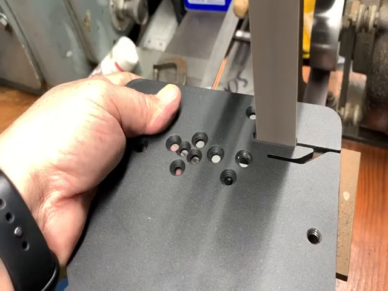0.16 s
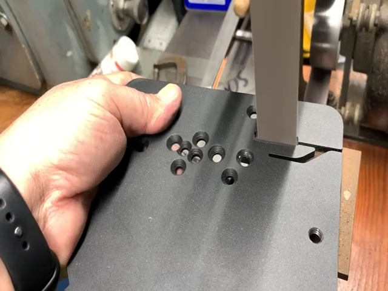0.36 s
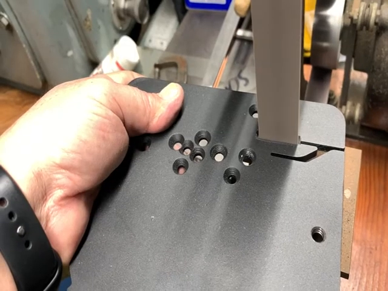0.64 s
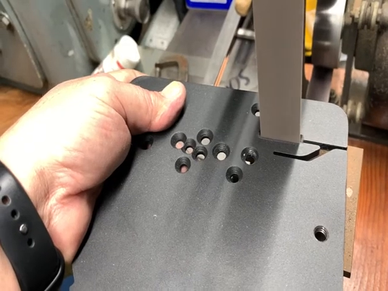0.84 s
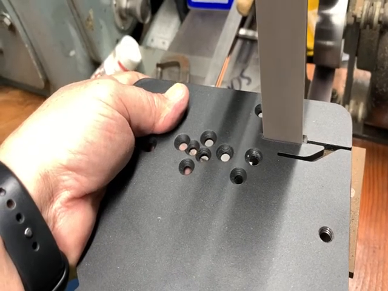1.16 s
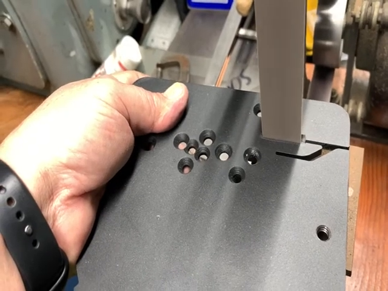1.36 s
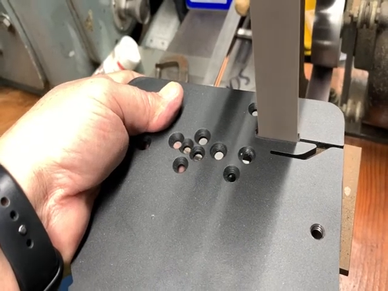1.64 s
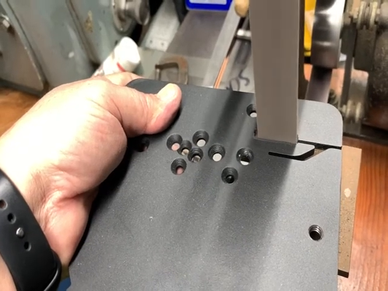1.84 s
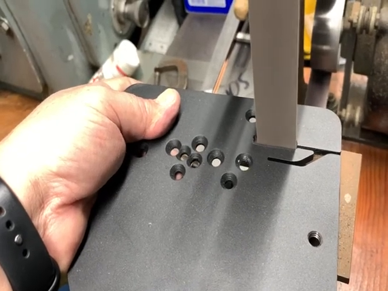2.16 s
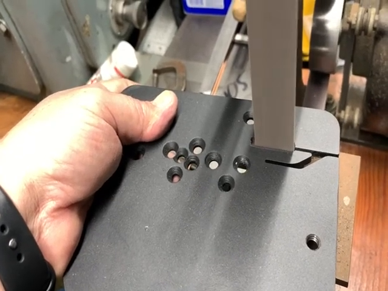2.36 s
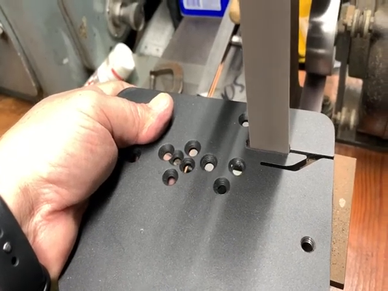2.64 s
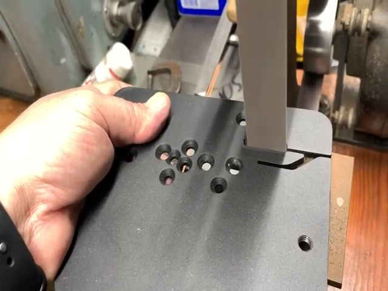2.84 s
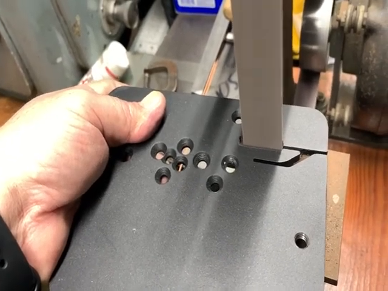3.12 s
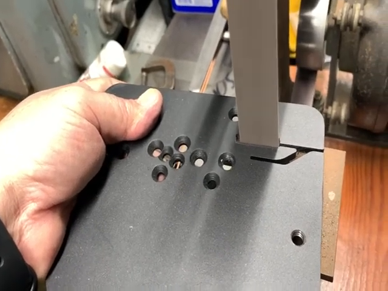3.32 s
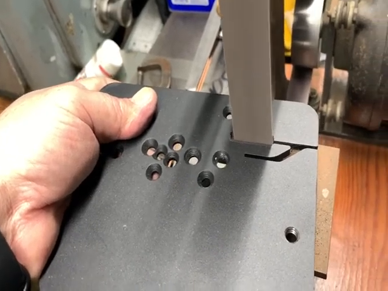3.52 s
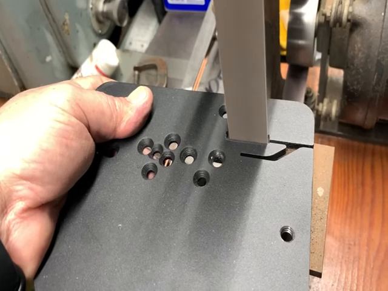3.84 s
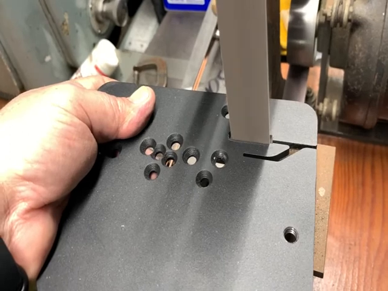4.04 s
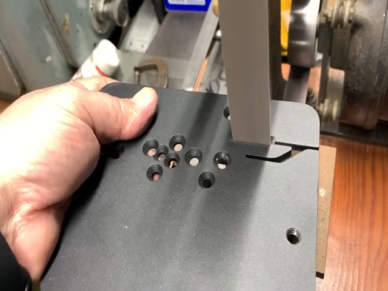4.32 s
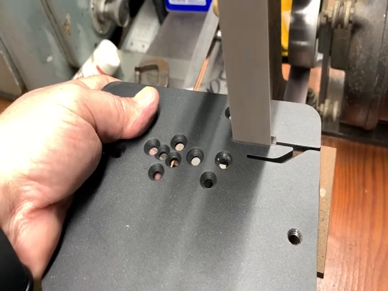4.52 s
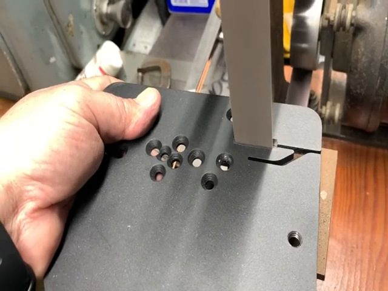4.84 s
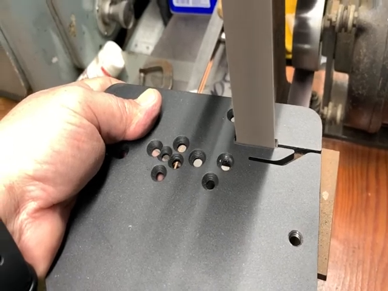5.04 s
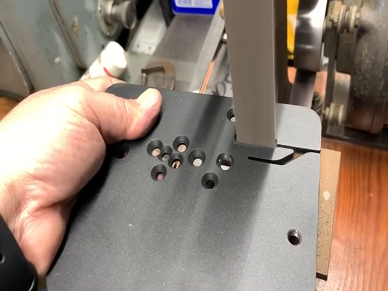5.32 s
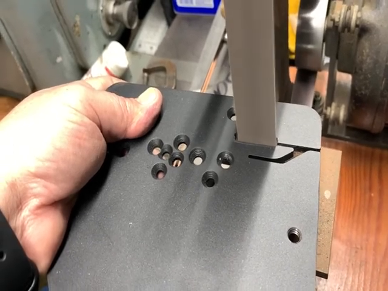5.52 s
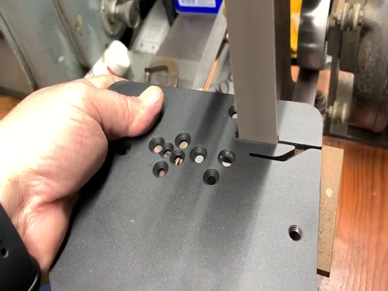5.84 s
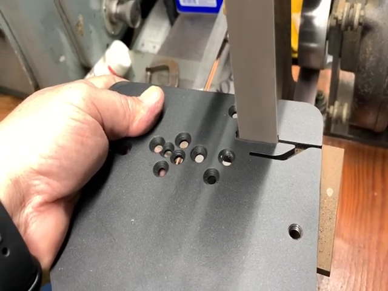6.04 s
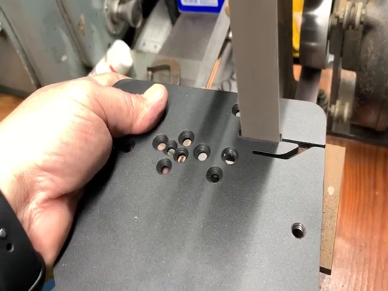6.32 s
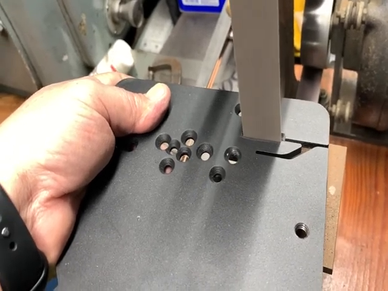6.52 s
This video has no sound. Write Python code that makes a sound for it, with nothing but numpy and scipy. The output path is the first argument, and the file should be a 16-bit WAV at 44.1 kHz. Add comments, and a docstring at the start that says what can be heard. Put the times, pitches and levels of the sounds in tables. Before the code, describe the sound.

In a workshop, a running abrasive belt grinds against a hand-held metal plate, close to the microphones. A bright, gritty hiss flutters in an uneven pattern repeating six or seven times a second. The plate rings thinly and its edge sings in spells, with sharp little ticks. Underneath, a motor hums, whirrs and rattles steadily. It runs from beginning to end without a stop.

```python
"""Endless abrasive band scraping along a metal plate

A motor drives a narrow endless abrasive band while a hand holds a metal plate against it, near the microphones.
Noise gated by the band's rough patches makes a gritty hiss whose pattern returns every lap; narrow resonances
of that rubbing make the plate ring thinly and its edge sing, and short decaying sines tick as the band snags.
Beneath, hum lines, shaped noise and bearing tones make the motor hum, whirr and knock once a turn,
and a low sine burst thumps once a lap as the band's joint passes."""
import sys
import numpy as np
from scipy import signal
from scipy.fft import rfft, irfft, next_fast_len
from scipy.io import wavfile

SR = 44100
rng = np.random.default_rng(int(sys.argv[2]) if len(sys.argv) > 2 else 0)


def file_out(sig):
    """Save sig as 16-bit WAV at sys.argv[1]."""
    # one column per channel
    cols = np.atleast_2d(sig).T
    # limit, then scale
    lim = np.clip(cols, -1, 1)
    pcm = np.round(lim * 32767).astype(np.int16)
    wavfile.write(sys.argv[1], SR, pcm)


N = 294147
FFT_SIZE = next_fast_len(N, True)
T, HZ = np.arange(N) / SR, np.fft.rfftfreq(FFT_SIZE, 1 / SR)  # seconds; Hz of each spectrum bin
LAP_HZ, MOTOR_HZ, BUZZ_HZ = 6.5515, 29.74, 120  # band laps, shaft turns, motor buzz

# Rough patches on the band, each catching at once and letting go gradually.
# Each row: place as a share of the lap, fall to 1/e as a share of the lap, strength in dB before the depth scaling.
SPOTS = [(.035, 0.037, -1.5), (.066, 0.016, 12.5), (0.102, 0.046, 8.5), (.125, 0.026, -5),
         (.183, 0.01, 13.5), (0.237, 0.02, 2.5), (.26, 0.064, 3.5), (.319, 0.016, 0), (.388, 0.021, 7),
         (.42, 0.042, -1), (.458, 0.022, 3.5), (.49, .02, -1.3), (.62, 0.039, 11.5), (.655, 0.055, -6.5),
         (0.699, 0.057, 5), (.785, .03, 0), (.82, 0.067, 6), (.875, 0.013, -12)]
# How the hand feeds the plate; the treble and rasp columns also colour the scraping.
# Each row: time in seconds, relative pressure in dB, extra top treble in dB, extra low rasp in dB.
FEED = [(0.1, -9.5, -2.5, -0.5), (.6, -10.5, 0, 1.6), (.95, -9.5, 0, -1.5), (1.25, -11.5, 0.5, 1.5),
        (1.8, -8, -2.5, -2), (2.5, -7.5, -4.5, -1.3), (3.7, -9, -1.5, 1.7), (4.5, -9.5, 1, -0.2),
        (5.1, -10, -1, -1), (5.9, -9.5, -2.5, 0.5), (6.55, -10.5, 2.5, 2.5)]


def bite(lap, motor):
    """Contact force: hand pressure, rough patches that depend a little on pressure, and the motor's shake."""
    catch_s = 0.00093  # how fast a patch catches
    patch_depth, deepen_per_db = .9, -.05  # patches stand out less as the pressure rises
    shaft_db, buzz_db, flutter_db, sway_db = .15, .95, .38, .5
    lap_db = np.zeros(N)
    for place, length, db in SPOTS:
        since = (lap - place) % 1
        catch = 1 - np.exp(-since / LAP_HZ / catch_s)
        let_go = np.exp(-(since / length) ** 2)
        lap_db += db * catch * let_go
    pressure_db = curves(FEED)[0]
    depth = patch_depth + deepen_per_db * (pressure_db - pressure_db.mean())
    patches_db = depth * (lap_db - lap_db.mean())
    shake_db = shaft_db * np.cos(2 * np.pi * motor) + buzz_db * np.cos(2 * np.pi * (BUZZ_HZ * T - .56))
    unsteady_db = flutter_db * drift(29) + sway_db * drift(10)
    return amp(pressure_db + patches_db + shake_db + unsteady_db)


# Colour of the scraping. Each row: frequency in Hz, relative density in dB per Hz.
SCRAPE = [(500, -27), (2350, -14), (2650, -5), (2850, -4.5), (3020, -6.5), (3300, -3), (3550, -5),
          (3780, -8), (4050, -17), (4250, -13), (4700, -16.5), (5050, -14.5), (5400, -7), (6000, -5),
          (6400, -2.5), (6750, -6.5), (7300, -5.5), (7800, 0), (9300, 0), (11400, 1.5), (12900, -2.5),
          (13700, 1), (14100, -4.5), (14700, -4), (15600, .5)]


def scraping(lap, force, level_db=-26.5):
    """Over a thousand tiny cuts a second return each lap, over a smooth rub and stray grit; weak modes ripple it."""
    ripple_db, ripple_hz = 1.4, 45  # random colour ripple and its spacing
    chatter_db, chatter_hz = .8, 14  # wavering of the low rasp
    cuts = grit(looped(lap, LAP_HZ), decay_s=.0004, rarity=1.85)
    stray = grit(rng.standard_normal(N), decay_s=.004, rarity=2.1)
    power = 1 + cuts + amp(-8) * stray  # the 1 is the smooth rub
    rub = force * np.sqrt(power) * rng.standard_normal((2, N))
    modes = np.arange(0, SR / 2, ripple_hz)
    ripple = ripple_db * np.interp(HZ, modes, rng.standard_normal(len(modes)))
    hiss = shaped(rub, causal(amp(over_hz(SCRAPE) + ripple)))
    top = shaped(hiss, 1 / (1 + (11300 / (HZ + 1)) ** 12))
    rasp = shaped(hiss, 1 / (1 + (HZ / 6800) ** 12))
    middle = hiss - top - rasp
    _, bright_db, rasp_db = curves(FEED)
    rasp_gain = amp(rasp_db + chatter_db * drift(chatter_hz))
    return amp(level_db) * unit(middle + top * amp(bright_db) + rasp * rasp_gain)


# Resonances of the held plate.
# Each row: frequency in Hz, offset in Hz where it is 6 dB down, level in dB before the grip varies it.
PLATE = [(2586, 22, -52.2), (3366, 17, -52.5), (4530, 40, -58), (4850, 25, -58.5), (6390, 70, -48.5),
         (7780, 174, -41.5), (8570, 170, -39.5), (10104, 22, -45)]
# Modes of the plate's edge that sing as the band rubs them.
# Each row: frequency in Hz, offset in Hz where it is 6 dB down, starting level in dB, growth in dB per second.
EDGE = [(3495, 22, -49.5, -.1), (7065, 30, -48, .5)]
# How strongly the edge sings. Each row: time in seconds, gain in dB.
SING = [(.1, 0), (.95, 3), (1.25, -9), (1.65, -1), (2.3, -2), (3.1, 1), (3.65, 1), (3.9, -7), (4.1, 2),
        (4.65, 4), (5.1, 1), (5.5, -4), (6.4, 0)]


def plate(force):
    """Rubbing excites the plate's modes, which the shifting grip bends and swells; its edge sings in spells."""
    grip_shift, grip_db = .0015, 2.2  # pitch bend as a share of the frequency; level change
    swell_db, swell_hz, waver_hz = 2, 14, 9  # the edge's swelling, its rate, its pitch waver
    rub = force * rng.standard_normal((2, N))
    out = np.zeros((2, N))
    for hz, width, db in PLATE:
        mode = bent(ring(rub, hz, width), hz * grip_shift * drift(3))
        out += amp(db + grip_db * drift(18)) * mode
    spell_db = curves(SING)[0] + swell_db * drift(swell_hz)
    for hz, width, db, growth in EDGE:
        mode = bent(ring(rub, hz, width), waver_hz * drift(swell_hz))
        out += amp(db + growth * T + spell_db) * mode
    return out


# Loud snags of the band on the edge. Each row: time in seconds, strength of the blow in dB before colouring.
SNAGS = [(.4275, -12), (1.1394, -15), (1.2718, -15), (1.4448, -13.5), (1.5759, -6), (1.5871, -10.5),
         (1.9298, -13), (2.4119, -14), (2.5644, -15), (3.0222, -14), (3.3719, -14), (3.8319, -14),
         (4.2902, -15), (4.6217, -15), (5.0535, -13), (5.7554, -10), (5.9065, -15), (6.3295, -13)]
# Colour of a tick. Each row: frequency in Hz, gain in dB.
TICK = [(1500, -27), (5000, -15), (8000, 3), (12000, -9), (15000, 15)]


def snags(force, small_per_s=170, small_db=-29, spread_db=2):
    """Sharp ticks, a few loud and many small ones crowding where the band bites: the edge rings a few cycles."""
    ring_hz, decay_s = 9200, .0004
    t = np.arange(256) / SR
    tick = np.sin(2 * np.pi * ring_hz * t) * np.exp(-t / decay_s)
    struck = rng.random(N) < small_per_s * unit(force) ** 2 / SR
    blows = struck * amp(small_db + spread_db * np.minimum(rng.exponential(1, N), 3))
    for s, db in SNAGS:
        blows[round(s * SR)] += amp(db)
    ticks = signal.oaconvolve(blows, tick)[:N]
    return np.array([shaped(ticks, causal(amp(over_hz(TICK)))), np.zeros(N)])  # all in the shared part


# Strength of the joint's thump. Each row: time in seconds, level in dB at the swell's peak before the lap spread.
SEAM_LEVEL = [(.3, -42), (.75, -42), (1.03, -36.5), (1.3, -43), (2.2, -45), (3.2, -50), (3.7, -40),
              (4.4, -38), (4.7, -37), (5.2, -47), (5.6, -50), (6.5, -40)]


def seam(lap):
    """The joint of the band thumps a wheel once a lap, with a random change of force from lap to lap."""
    place, thump_hz, rise_s, spread_db = .598, 311.7, .017, 1  # place is a share of the lap
    since_s = (lap - place) % 1 / LAP_HZ
    turn = np.floor(lap - place).astype(int) + 1
    uneven_db = spread_db * rng.standard_normal(turn.max() + 1)[turn]
    swell = (since_s / rise_s * np.exp(1 - since_s / rise_s)) ** 4
    thump = amp(curves(SEAM_LEVEL)[0] + uneven_db) * swell * np.sin(2 * np.pi * thump_hz * since_s)
    return np.array([thump, np.zeros(N)])  # all in the shared part


# Motor hum, its sidebands at the shaft rate and a tone of the running band.
# Each row: frequency in Hz, rms level in dB before wavering, stereo balance and the machine's swell.
HUM = [(119.9, -46.5), (149.7, -63.5), (180, -67), (210.3, -65), (240.1, -52.5), (269.7, -57), (299.6, -70),
       (314.5, -64.5), (360.0, -44.5), (389.6, -64), (419.5, -65.5), (659, -72), (689, -79)]


def hum(waver=.083, shaft_waver_rad=.58, mains_waver_rad=.066):
    """Sine lines waver in level; mains harmonics hold nearly still while lines of the turning parts wander more."""
    out = np.zeros(N)
    for hz, db in HUM:
        from_mains = abs(hz / BUZZ_HZ - round(hz / BUZZ_HZ)) < .02
        wander = (mains_waver_rad if from_mains else shaft_waver_rad) * drift(2.2)
        line = np.sqrt(2) * np.cos(2 * np.pi * (hz * T + rng.random()) + wander)
        out += amp(db) * (1 + waver * drift(4.2)) * line
    return out * amp([[-.6], [.6]])  # slightly stronger on the right


# Colour of the drive's rattle. Each row: frequency in Hz, relative density in dB per Hz.
RATTLE = [(300, -43), (490, -19), (600, -3), (680, -2.5), (810, 6), (920, 2.5), (1050, 2), (1150, 0.5),
          (1500, -4.5), (2050, 0), (2450, 1), (3000, -9), (5000, -23.5)]


def rattle(lap, motor, level_db=-45.5):
    """Bearings and wheels rustle and clatter, with a knock at one place in each turn of the shaft."""
    knock_db, knock_at, knock_width = 4, .31, .23  # place and width are shares of a turn
    motor_share, lap_share, clatter = .65, .52, .5  # repeating noise by amplitude; loose clatter by power
    from_knock = (motor - knock_at + .5) % 1 - .5
    knock = np.exp(-(from_knock / knock_width) ** 2)
    loose = np.sqrt(1 + clatter * grit(rng.standard_normal(N), decay_s=.003, rarity=2.7))
    rolling = rng.standard_normal((2, N))
    for side in rolling:
        side += motor_share * looped(motor, MOTOR_HZ) + lap_share * looped(lap, LAP_HZ)
    clattering = rolling * loose * amp(knock_db * knock)
    return amp(level_db) * unit(shaped(clattering, causal(amp(over_hz(RATTLE)))))


# Colour of the shaking frame. Each row: frequency in Hz, relative density in dB per Hz.
FRAME = [(25, -47), (52, -5), (75, -12), (95, 3), (130, -10.5), (190, -2), (245, -6), (310, 0.5), (345, -5),
         (395, 2.5), (425, -4.5), (455, -9), (505, -10.5), (540, -1), (590, -4.5), (690, -18),
         (1200, -20.5)]


def frame(lap, level_db=-46.5, repeat=.2, throb_db=.8, throb_hz=14):
    """The running band shakes the frame in uneven throbs; a share of the noise power repeats each lap."""
    same_each_lap = np.array([looped(lap, LAP_HZ), looped(lap, LAP_HZ)])
    fresh = rng.standard_normal((2, N))
    shake = np.sqrt(repeat) * same_each_lap + np.sqrt(1 - repeat) * fresh
    throbbing = shake * amp(throb_db * drift(throb_hz))
    return amp(level_db) * unit(shaped(throbbing, causal(amp(over_hz(FRAME)))))


# Wavering tones of the bearings.
# Each row: frequency in Hz, offset in Hz where it is 6 dB down, rms level in dB before the machine's swell.
WHIRR = [(568, 7, -61.5), (599.4, 5, -57.5), (627, 5, -57.5), (806, 8, -62), (842, 8, -62), (912, 10, -59),
         (1012, 5, -58.5), (2026, 8, -60)]


def whirr():
    """The bearings sing in narrow bands of noise: tones that swell, fade and waver."""
    return sum(amp(db) * ring(rng.standard_normal((2, N)), hz, width) for hz, width, db in WHIRR)


# Likeness of the two microphones. Each row: frequency in Hz, coherence from 0 to 1.
SAME = [(100, 0.92), (600, 0.93), (950, 0.93), (1250, 0.35), (2500, 0.52), (2900, 0.95), (3060, .95),
        (3300, 0.85), (3490, .98), (3750, 0.4), (5200, 0.54), (5600, 0.8), (6200, .9), (6600, 0.995),
        (7200, .995), (8000, .97), (11500, 1), (13000, .98), (15000, .98)]
# Lead of the left microphone below the treble. Each row: frequency in Hz, phase in radians.
LEAD = [(50, -0.3), (250, 0.77), (900, 0.26), (1250, 2.5), (1800, -1.5), (2400, -1), (2750, 3.9), (2950, 3),
        (3060, 3.2), (3250, 4.5), (3366, 1.2), (3430, 2.4), (3530, 2.6), (3800, 0), (5200, 1.2),
        (5450, -2.1), (6000, -2.3), (6400, -2.85), (6800, -3.14), (7150, -3.3), (7400, -3.7)]
# Level of the left microphone over the right. Each row: frequency in Hz, difference in dB.
TILT = [(110, 4.5), (250, -1), (700, 1), (1290, 2.5), (2400, 0), (6000, 0)]


def microphones(pair):
    """Two microphones share most of the sound; the treble paths to them differ by a few centimetres."""
    treble_lead_ms = -.216  # left over right: the hiss reaches the right one first
    same = np.clip(over_hz(SAME), 0, 1)
    lead = np.where(HZ < LEAD[-1][0], over_hz(LEAD), 2 * np.pi * HZ * treble_lead_ms / 1000)
    left, separate = pair
    right = shaped(left, same * np.exp(-1j * lead)) + shaped(separate, np.sqrt(1 - same ** 2))
    return shaped(np.array([left, right]), amp(np.outer([.5, -.5], over_hz(TILT))))


def amp(db):
    """Decibels to gain."""
    return 10 ** (np.asarray(db) / 20)


def unit(x):
    """Scales to rms 1."""
    return x / np.sqrt(np.mean(x ** 2) + 1e-20)


def curves(rows):
    """Each column of a time table, at every sample."""
    s, *columns = np.transpose(rows)
    return [np.interp(T, s, c) for c in columns]


def over_hz(points):
    """A spectrum table on a log-frequency axis."""
    hz, value = np.transpose(points)
    return np.interp(np.log(HZ + 1), np.log(hz), value)


def shaped(x, response):
    """Filters by a frequency response."""
    return irfft(rfft(x, FFT_SIZE) * response, FFT_SIZE)[..., :N]


def causal(gain):
    """A minimum-phase response with this gain, which rings only after it is struck."""
    cepstrum = irfft(np.log(gain), FFT_SIZE)
    cepstrum[1:] *= 2
    cepstrum[len(cepstrum) // 2:] = 0
    return np.exp(rfft(cepstrum))


def drift(rate_hz):
    """Smooth random wander of rms 1."""
    return unit(shaped(rng.standard_normal(N), np.exp(-(HZ / rate_hz) ** 2)))


def ring(x, hz, width_hz):
    """One resonance with steep skirts, at rms 1."""
    return unit(shaped(x, 1 / (1 + 1j * (HZ - hz) / width_hz) ** 2))


def bent(x, shift_hz):
    """Moves a narrow sound up and down by a curve in Hz."""
    analytic = signal.hilbert(x, FFT_SIZE)[..., :N]
    return (analytic * np.exp(2j * np.pi * np.cumsum(shift_hz) / SR)).real


def looped(turns, rate_hz):
    """Random unevenness fixed to a turning part, so that it returns with every turn."""
    size = int(SR / rate_hz)
    return rng.standard_normal(size)[(turns % 1 * size).astype(int)]


def grit(draw, decay_s, rarity):
    """The highest values of a random draw are sharp points: each bites at once and dies away; mean 1."""
    points = np.maximum(draw - rarity, 0)
    bites = signal.lfilter([1], [1, -np.exp(-1 / (decay_s * SR))], points)
    return bites / (bites.mean() + 1e-12)


def scene():
    """One slightly unsteady drive turns both shaft and band."""
    clock = T + .0004 * drift(.7)  # seconds
    lap, motor = LAP_HZ * clock, MOTOR_HZ * clock
    force = bite(lap, motor)
    work = scraping(lap, force) + plate(force) + snags(force) + seam(lap)
    machine = amp(np.interp(T, [0, 3], [-1.2, .3]))  # drones a little louder as the work settles
    drive = machine * (rattle(lap, motor) + frame(lap) + whirr())
    return microphones(work + drive) + machine * hum()


def record(dry):
    """A steep low-pass: no treble above about 15.8 kHz."""
    cutoff_hz = 15760
    lowpass = signal.firwin(1023, cutoff_hz, window=("kaiser", 9), fs=SR)
    return signal.oaconvolve(dry, lowpass[None], "same")


dry = scene()
out = record(dry)
file_out(out)
```